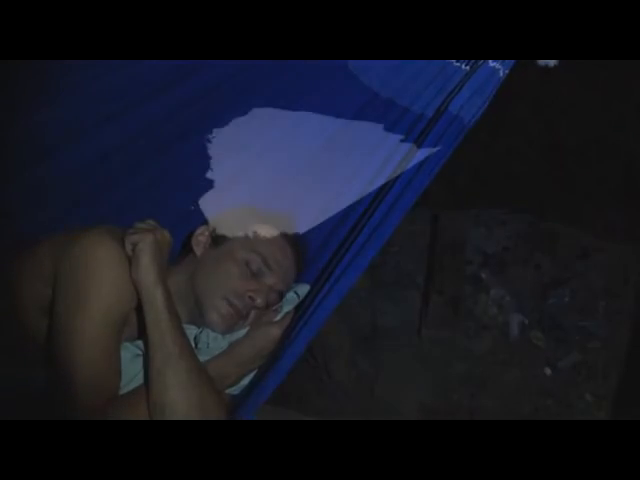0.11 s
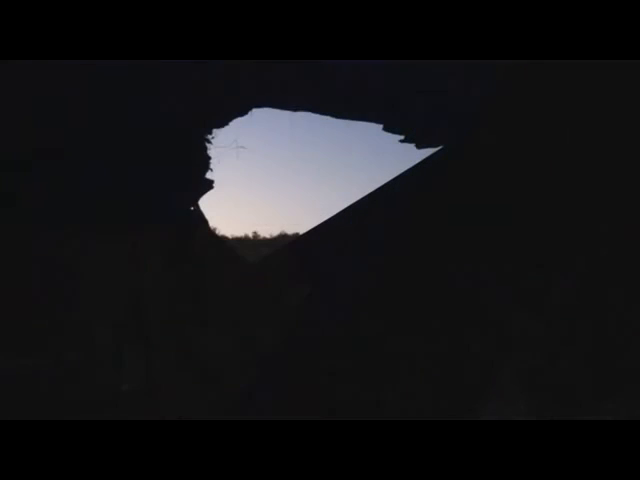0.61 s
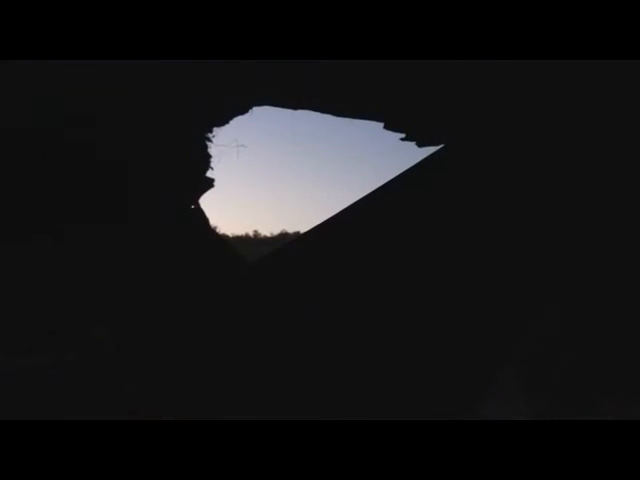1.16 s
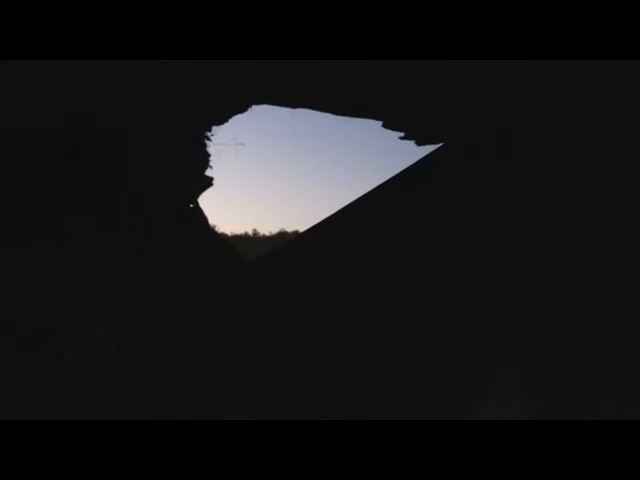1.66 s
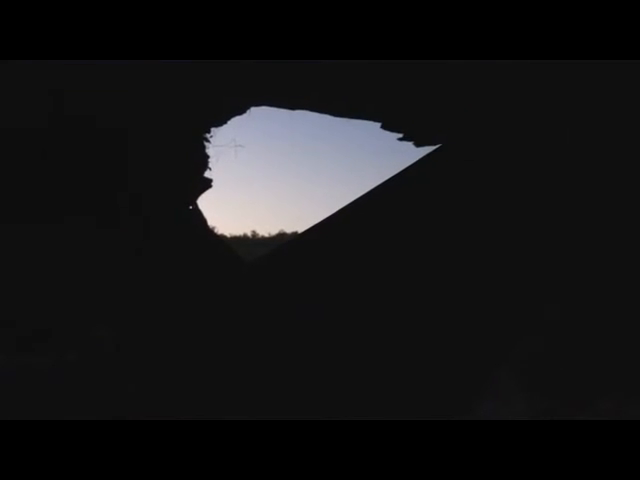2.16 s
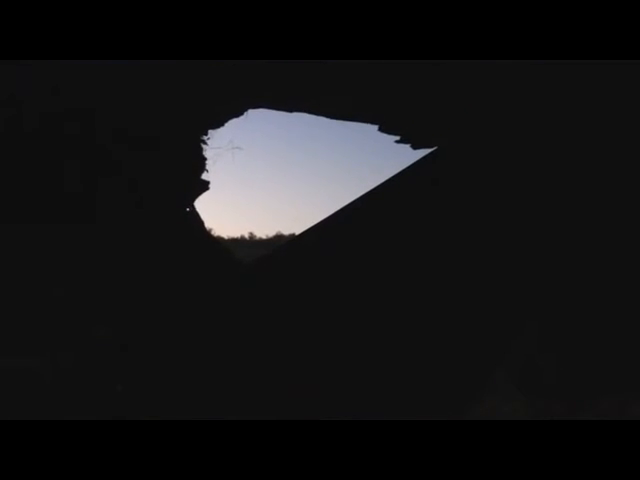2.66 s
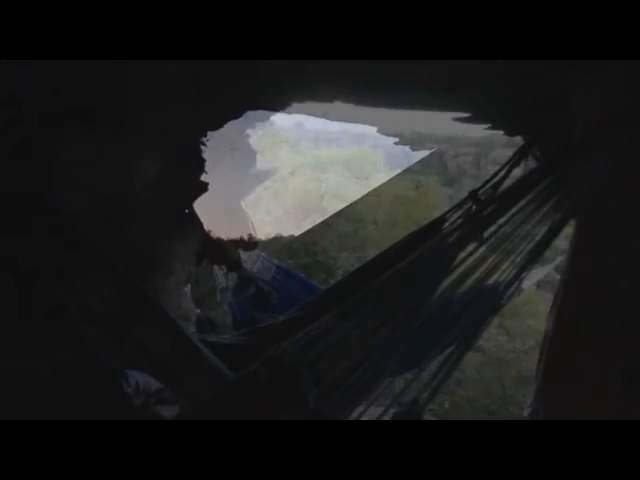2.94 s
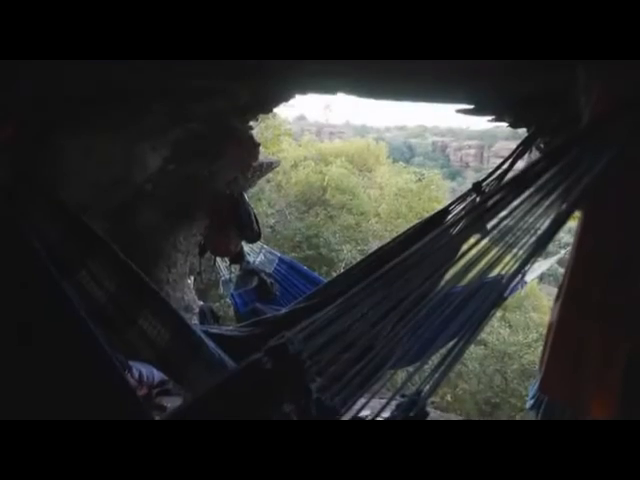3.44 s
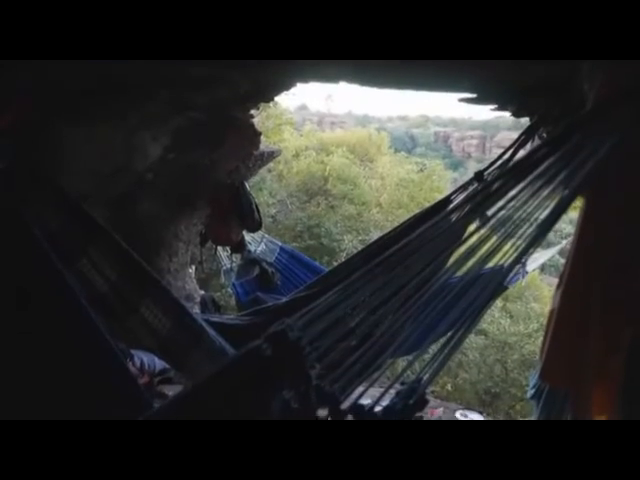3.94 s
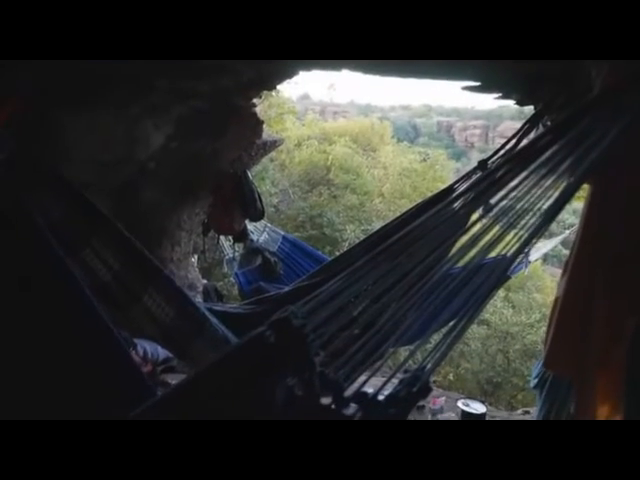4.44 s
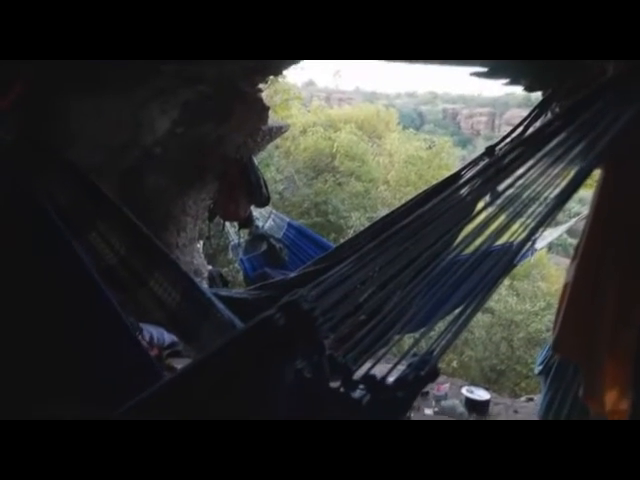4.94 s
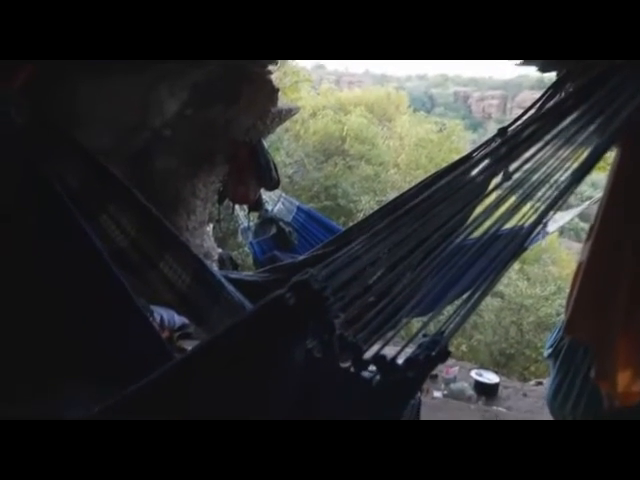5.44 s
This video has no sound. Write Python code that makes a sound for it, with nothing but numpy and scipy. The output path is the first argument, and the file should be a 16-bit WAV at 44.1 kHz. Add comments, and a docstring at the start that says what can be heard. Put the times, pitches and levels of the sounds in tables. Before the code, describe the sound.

High steady insect drone with cricket trills, faint echoing bird whistles, dull knocks near a humming small camera, then three distant hoots.

```python
"""A rock shelter in a wooded canyon at dawn, heard through a small camera with two microphone ports.
Insects drone, buzz and trill: noise clicks ring at wing pitches, and one cricket's tone comes in bursts.
Far birds whistle, churr and coo, a nearer one hoots three times: wavering sine tones with canyon echoes.
Dull knocks are short ringing tones. The camera's motor is noise that pushes the ports in opposite sense,
with two wavering hums, a ringing housing and hiss. The background drops to a quieter level at about 3.1 s."""
import sys
import numpy as np
from scipy import signal
from scipy.fft import rfft, irfft
from scipy.io import wavfile
from scipy.ndimage import uniform_filter1d

SR = 44100
rng = np.random.default_rng(int(sys.argv[2]) if len(sys.argv) > 2 else 0)


def nominal_scale(level):
    """Amplitude ratio for a level in decibels (scalar or array-like)."""
    x = np.asarray(level, float) / 20
    return 10 ** x


def store_pcm(level_fs):
    """Save levels as 16-bit WAV."""
    pcm = np.round(np.clip(level_fs, -1, 1) * 32767).astype(np.int16)
    wavfile.write(sys.argv[1], SR, np.atleast_2d(pcm).T)


N = 246078
T = np.arange(N) / SR  # time in seconds
AIR_LEAD_RAD = -.5  # the left port trails the right by this phase

# background level: fades in, holds, then crossfades within .26 s at about 3.1 s from louder to quieter;
# the crickets, hiss, idling motor and housing follow it: time_s, level_db (relative)
BACKGROUND = [(0, -4), (.3, -3), (.72, 0.5), (3.1, -0.5), (3.36, -4), (5.58, -5)]


def unit(x):
    """Scale to rms 1."""
    return x / np.sqrt(np.mean(x ** 2))


def curve(rows, axis):
    """One column of a table drawn as straight lines over time; its end values are held outside."""
    rows = np.array(rows)
    return np.interp(T, rows[:, 0], rows[:, axis])


def gate(rows, edge_s):
    """1 from the first to the last time of a table, 0 outside, with soft edges."""
    inside_s = np.minimum(T - rows[0][0], rows[-1][0] - T)
    return np.clip(inside_s / edge_s + .5, 0, 1) ** 2


def walk(rate_hz, size=N):
    """Smooth random wandering that turns about rate_hz times a second, with rms 1."""
    width = max(int(SR / rate_hz), 2)
    smooth = uniform_filter1d(rng.standard_normal(size), width)
    return unit(uniform_filter1d(smooth, width))


def shaped(hz, db):
    """Noise of rms 1 whose spectrum is straight lines over log frequency."""
    f = np.maximum(np.fft.rfftfreq(N, 1 / SR), 1)
    gain = nominal_scale(np.interp(np.log(f), np.log(hz), db))
    return unit(irfft(rfft(rng.standard_normal(N)) * gain, N))


def ring(x, modes):
    """Resonances (pitch_hz, width_hz of one pass, level_db), each applied twice for steep skirts."""
    out = 0
    for hz, width, db in modes:
        b, a = signal.iirpeak(hz, hz / width, fs=SR)
        once = signal.lfilter(b, a, x)
        out = out + nominal_scale(db) * signal.lfilter(b, a, once)
    return out


def place(x, pan_db, lead_rad):
    """One sound on both ports: pan_db is left minus right, lead_rad is how far the left leads."""
    turn = np.exp(.5j * lead_rad * np.array([[1], [-1]]))
    return (signal.hilbert(x) * turn).real * nominal_scale(np.array([[pan_db], [-pan_db]]) / 2)


def canyon(x, spread_s, wet_db, rise_s):
    """Dense echoes from near rock walls, unrelated on the two ports: they rise, then die ever faster."""
    t = T[:SR // 2]
    envelope = np.exp(-(t / spread_s) ** 1.5) * np.clip(t / rise_s, 0, 1)
    echo = rng.standard_normal((2, len(t))) * envelope
    echo = echo / np.sqrt(np.sum(echo ** 2, axis=1, keepdims=True))
    return nominal_scale(wet_db) * signal.fftconvolve(x[None], echo, axes=1)[:, :N]


def voice(rows, partials, waver, flutter_db, rate_hz):
    """Sine partials (multiple, level_db) whose pitch wavers while each one's level flutters."""
    on = gate(rows, .012)
    span = on > 0
    size = span.sum()
    pitch_hz = curve(rows, axis=1)[span] * (1 + waver * walk(rate_hz, size))
    phase = 2 * np.pi * np.cumsum(pitch_hz) / SR
    out = np.zeros(N)
    for multiple, db in partials:
        out[span] += nominal_scale(db + flutter_db * walk(rate_hz, size)) * np.sin(multiple * phase)
    return np.sqrt(2) * out * nominal_scale(curve(rows, axis=2)) * on


def hum(hz, pan_db, lead_rad, db):
    """A motor tone whose pitch and level waver a little."""
    phase = 2 * np.pi * np.cumsum(hz * (1 + .003 * walk(8))) / SR
    return place(np.sin(phase), pan_db, lead_rad) * nominal_scale(db + 0.9 * walk(19))


def camera():
    """Motor rumble pushes the ports in opposite sense; hums and a ringing housing join; each port hisses."""
    # the motor under load, one row a spell: start_s, end_s, hum_db, rumble_db (before the mix below)
    motor = [(.05, 2.42, -59, -58.5), (3.09, 3.22, -58.5, -57.5), (3.47, 3.56, -71, -56),
             (4.08, 6.8, -59, -58)]
    # colour of the motor rumble: pitch_hz, level_db (per Hz, relative)
    rumble_colour = [(30, -44), (90, -26.5), (200, -2), (400, -1), (580, 3), (750, 0.5), (1000, -4.5),
                     (2000, -13), (4000, -27)]
    # the low and the high motor hum: pitch_hz, left_minus_right_db, left_lead_rad
    hums = [(255, 8, -1.8), (618, 5, -2.6)]
    # resonance of the housing: pitch_hz, width_hz (of one pass), level_db
    housing = [(567.6, 120, 0)]
    # colour of the microphone hiss: pitch_hz, left_db, right_db (each port relative to itself)
    hiss_colour = [(30, -5, 3.5), (294, 10.5, 3), (860, 0.5, 13.5), (1990, 10, 10), (3300, 9, 10),
                   (4100, 6.5, 4), (5160, 6, 10), (6460, -10, -14), (7150, 2, 4.5), (11150, 2, 5.5),
                   (11600, -30, 9.5), (16500, -35, 7)]
    idle_db, high_hum_db, boom_db, hiss_db = -62, -55, -53.5, -55.5  # before port balance

    far_db = curve(BACKGROUND, axis=1)
    swell_db = np.minimum(T / .5 - 1, 0) * 5.9  # the motor swells in over half a second
    warm = nominal_scale(0.63 * swell_db)
    spells = [gate([(start,), (end,)], 0.076) for start, end, _, _ in motor]
    low_hum = sum(on * nominal_scale(row[2]) for on, row in zip(spells, motor)) * warm
    loaded = sum(on * nominal_scale(row[3]) for on, row in zip(spells, motor)) * warm
    load = np.maximum(nominal_scale(idle_db + far_db), loaded)

    hz, db = np.transpose(rumble_colour)
    shell, left, right = (shaped(hz, db) * nominal_scale(1.5 * walk(14)) for _ in range(3))
    own = nominal_scale(np.array([[4.], [6.]])) * np.array([left, right])
    rumble = nominal_scale(1.5) * place(shell, 4.5, np.pi) + own
    out = rumble * load * nominal_scale(1.25 * walk(7.6))

    # the housing rings most near the left port
    boom = unit(ring(rng.standard_normal(N), housing))
    boom = boom * nominal_scale(boom_db + 1.33 * far_db + 2.3 * walk(21.0))
    out = out + place(boom, 6.45, -3.06)
    out = out + hum(*hums[0], 0) * low_hum + hum(*hums[1], high_hum_db + swell_db)

    hz, *sides = np.transpose(hiss_colour)
    hiss = np.array([shaped(hz, side) * nominal_scale(.4 * walk(40)) for side in sides])
    port_db = np.array([[3.5], [6.5]])
    return out + hiss * nominal_scale(hiss_db + far_db + port_db)


def crickets(modes, share, throb_db):
    """Countless wing clicks into a resonance; a share comes from one side, the rest from all round."""
    def swarm():
        """Noise that throbs in level and rings at the wing pitches."""
        return unit(ring(rng.standard_normal(N) * nominal_scale(throb_db * walk(105)), modes))

    around = np.array([swarm(), swarm()])
    return np.sqrt(share) * place(swarm(), 0, AIR_LEAD_RAD) + np.sqrt(1 - share) * around


def chorus():
    """Two steady bands of far crickets, and one loud buzzing insect at the start, all from ringing noise."""
    # wing resonances of the three: pitch_hz, width_hz (of one pass), level_db (relative)
    low_modes = [(4200, 117, 0), (4335, 333, 9)]
    high_modes = [(5570, 690, 4.5), (5800, 1040, 7.5), (5130, 950, 2.5)]
    buzz_modes = [(6685, 70, -4), (6750, 60, 0), (6850, 80, -2), (6900, 70, -3), (6965, 55, -3)]
    # course of the buzz: time_s, level_db (before port balance)
    buzz_course = [(0, -29), (.07, -49), (.19, -42), (.33, -42.5), (.77, -56.5), (.82, -78), (1.2, -74)]

    far_db = curve(BACKGROUND, axis=1)
    # the columns of two numbers balance left and right in dB
    low_db = -51 + far_db + 0.41 * walk(4) + np.array([[2.2], [-.6]])
    high_db = -52.5 + 0.83 * far_db + 0.39 * walk(4.6) + np.array([[1.6], [.9]])
    buzz_db = curve(buzz_course, axis=1) + np.array([[1.6], [-.4]])
    low = crickets(low_modes, 0.59, 0.27) * nominal_scale(low_db)
    high = crickets(high_modes, 0.59, 0.93) * nominal_scale(high_db)
    buzz = crickets(buzz_modes, 0.72, 2.7) * nominal_scale(buzz_db) * gate(buzz_course, 0.1)
    return low + high + buzz


def call(start_s, length_s, first_hz, mid_hz, last_hz, db):
    """A call bends through three pitches while it swells, holds and fades."""
    part = np.linspace(0, 1, 9)
    hz = np.polyval(np.polyfit([0, .5, 1], [first_hz, mid_hz, last_hz], 2), part)
    # it swells from -4 dB over the first .2 of its length and fades to -6 dB over the last .3
    swell_db = -4 * np.clip(1 - part / .2, 0, 1)
    fade_db = -6 * np.clip(1 - (1 - part) / .3, 0, 1)
    return np.transpose([start_s + length_s * part, hz, db + swell_db + fade_db])


def songbirds():
    """Bending sine calls: far whistles and blurred calls are mostly echo; clearer notes keep their line."""
    # all three: start_s, length_s, first_hz, middle_hz, last_hz, level_db (before flutter and echo)
    # far songbirds blurred by distance, one row a bend; a long falling sweep takes two rows
    whistles = [(0.656, 0.092, 3260, 2546, 1706, -46.5), (.77, 0.048, 2295, 2730, 3170, -46.5),
                (0.812, 0.067, 3100, 2400, 1710, -48), (1.468, 0.079, 3550, 2950, 2300, -51.5),
                (1.524, .065, 2340, 1660, 1370, -45.5), (1.593, 0.054, 2700, 3180, 2670, -45),
                (1.685, 0.079, 4100, 2820, 1940, -48), (1.845, .07, 2340, 1844, 1350, -51.5),
                (2.829, .09, 4200, 3650, 2870, -44.5), (2.91, 0.04, 3010, 2400, 1860, -46),
                (0.069, .07, 1436, 1376, 1290, -57)]
    # far birds, faint and blurred: hoarse churrs near 3 kHz and low coos near 900 Hz
    faint_calls = [(0, 0.41, 2782, 2742, 2770, -58), (0.201, 0.53, 3100, 3060, 3300, -60),
                   (0.101, 0.23, 850, 838, 816, -62.5), (3.851, .08, 983, 952, 944, -61.5),
                   (4.022, 0.064, 910, 918, 910, -61.5), (4.802, 0.075, 940, 937, 950, -63.5)]
    # clearer notes of other birds
    clear_notes = [(1.236, .06, 1450, 1430, 1440, -44.5), (1.287, 0.051, 1390, 1322, 1200, -52),
                   (2.729, 0.031, 2040, 2050, 2120, -47), (2.757, 0.042, 2220, 2500, 2600, -49.5),
                   (2.783, .135, 2600, 2730, 2516, -45.5), (5.544, .12, 1110, 1174, 1200, -50)]

    far = sum(voice(call(*row), [(1, 0)], .011, 3., 200) for row in whistles)
    far = far + sum(voice(call(*row), [(1, 0)], .025, 5., 250) for row in faint_calls)
    notes = sum(voice(call(*row), [(1, 0)], .012, 3.5, 90) for row in clear_notes)
    # the first echoes come from the bird's own side
    early = canyon(far, .025, -4., .002)[0]
    far = place(nominal_scale(-4.5) * far + early, 2.2, AIR_LEAD_RAD) + canyon(far, .065, -2., .015)
    return far + place(notes, 0.69, AIR_LEAD_RAD) + canyon(notes, 0.065, -7.0, 0.025)


def trill():
    """One cricket: each wing stroke is a short burst of the wing's tone."""
    # one row a bout: start_s, length_s, wing_pitch_hz, first_db, last_db (before bursts and echo)
    bout_rows = [(0.411, 0.66, 6360, -49, -47), (1.099, 0.26, 6420, -56, -54),
                 (1.447, 0.58, 6130, -53.5, -48.5), (2.583, 0.53, 6297, -49.5, -48),
                 (3.123, 0.22, 6330, -51, -66)]
    strokes_hz = 59.

    stroke = np.cumsum(strokes_hz * (1 + 0.0236 * walk(5.6))) / SR % 1
    # the wing sounds for the first 0.72 of each stroke
    burst = unit(np.sin(np.pi * np.clip(stroke / 0.72, 0, 1)) ** 2)
    song = 0
    for start, length, hz, first_db, last_db in bout_rows:
        bout = [(start, hz, first_db), (start + length, hz, last_db)]
        song = song + burst * voice(bout, [(1, 0)], 0.0135, 0.73, 161.2)
    return nominal_scale(-5.0) * place(song, 2.1, AIR_LEAD_RAD) + canyon(song, 0.12, -4.0, 0.0033)


def knocks():
    """Dull blows close by: a tick, grit, a slower push into a few short modes, a rattle of echo."""
    # one row a blow: start_s, level_db (relative), left_minus_right_db, sharpness_db (tick and grit)
    blows = [(1.869, -44.5, 0, -9), (2.089, -45, -6, -18), (2.336, -66, -7, -6), (3.113, -40, -11.5, -2.5),
             (3.4926, -33.5, -4, 1)]
    # ringing modes of the thing struck: pitch_hz, level_db (relative), time_to_fall_60_db_s
    modes = [(131, -15.5, 0.074), (295, -5, 0.07), (401, -3.5, 0.072), (605, 2, 0.026), (879, -6.5, 0.061),
             (1296, -27, 0.032), (1744, -4, 0.057), (2400, -9, 0.039)]
    # the tick: pitch_hz, time_to_fall_60_db_s (a single row)
    tick_hz, tick_t60 = (1330, 0.0064)

    t = T[:SR // 4]
    tick = np.sin(2 * np.pi * tick_hz * t) * np.exp(-np.log(1000) * t / tick_t60)
    tick = tick * (1 - np.exp(-t / 0.00078))
    body = 0
    for hz, db, t60 in modes:
        body = body + nominal_scale(db) * np.sin(2 * np.pi * hz * t) * np.exp(-np.log(1000) * t / t60)
    body = body * np.clip(t / 0.0033, 0, 1) ** 2
    # loose grit rattles along with the blow
    grit = ring(rng.standard_normal(len(t)), [(1900, 3500, 0)])
    grit = grit * np.exp(-t / .018) * np.clip(t / .004, 0, 1)
    sharp = nominal_scale(14.0) * tick + nominal_scale(-5.0) * grit

    high_pass = signal.butter(2, 110., "high", fs=SR)
    out = np.zeros((2, N))
    for start_s, db, pan_db, sharp_db in blows:
        hit = np.zeros(N)
        first = int(start_s * SR)
        hit[first:first + len(t)] = nominal_scale(db) * (body + nominal_scale(sharp_db) * sharp)
        hit = signal.lfilter(*high_pass, hit)
        out = out + place(hit, pan_db, 0.84) + canyon(hit, 0.079, 1.0, 0.018)
    return out


def hooter():
    """Hoots from the right; at both ends breath breaks the tone into rasp; echoes make them beat."""
    # one row a hoot: loudest_moment_s, strong_second_partial_hz, level_db (before partials and echo),
    # stretch (times), side_partials_db, lead_in_stretch (times)
    hoots = [(3.162, 1594, -41, 1.05, -1.5, 0.83), (4.128, 1580, -41.5, .93, -2, 1.28),
             (5.1, 1595, -43, .99, 1, 1.3)]
    # partials: multiple (of the strong partial's pitch), level_db (relative)
    hoot_partials = [(.5, -10.5), (0.752, -19), (1, 3.5), (1.5, -17)]
    # course of a hoot: from_loudest_moment_s (before stretch), pitch_ratio, level_db, hoarseness (0-1)
    hoot_shape = np.array([(-.08, .8, -18, .95), (-.046, .95, -14, .85), (-.038, .995, -4, .15),
                           (0, 1.0, 0, .1), (.03, .997, -10, .12), (.07, .96, -5, .12),
                           (.12, .962, -7, .15), (.19, .968, -6, .15), (.222, .91, -6, .42),
                           (.258, .77, -10, .7)])

    hoot = 0
    for moment_s, hz, db, stretch, side_db, lead in hoots:
        partials = [(k, p + side_db * (k != 1)) for k, p in hoot_partials]
        offset_s, ratio, shape_db, rasp = hoot_shape.T
        time_s = moment_s + offset_s * np.where(offset_s < 0, lead, stretch)
        rows = np.column_stack([time_s, ratio * hz, db + shape_db, rasp])
        hoarse = curve(rows, axis=3)
        breath = np.sqrt(1 - hoarse ** 2) + hoarse * walk(500)
        hoot = hoot + breath * voice(rows, partials, .0025, 3.2, 75)
    return nominal_scale(-1.5) * place(hoot, -3.5, .1) + canyon(hoot, .1, -4., .02)


def scene():
    """Everything at the two ports."""
    return camera() + chorus() + songbirds() + trill() + knocks() + hooter()


def top_cut(x):
    """Nothing passes above the cut-off."""
    return signal.sosfilt(signal.butter(12, 15740, fs=SR, output="sos"), x)


def record(dry):
    """A steep low-pass removes the very top of the sound."""
    top_hz = 15740
    low_pass = signal.ellip(10, .2, 60, top_hz, fs=SR, output="sos")  # .2 dB ripple, 60 dB stop
    mix = signal.sosfilt(low_pass, dry)
    return top_cut(mix)


dry = scene()
out = record(dry)
store_pcm(out)
```